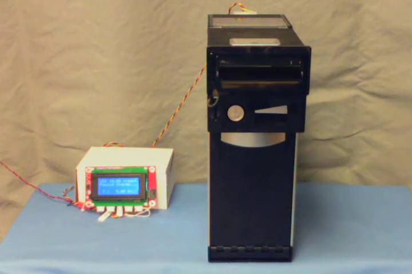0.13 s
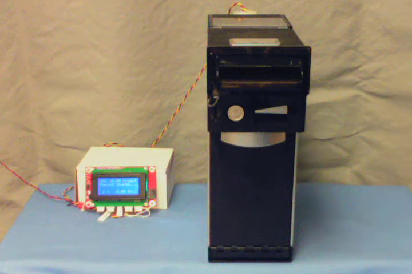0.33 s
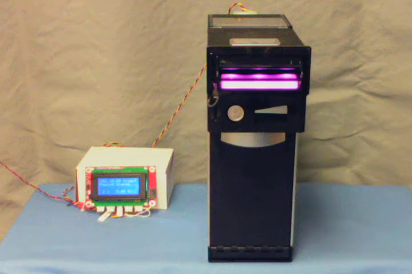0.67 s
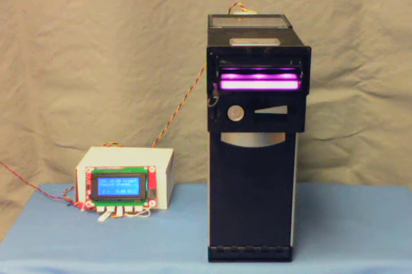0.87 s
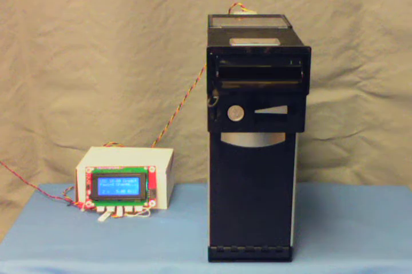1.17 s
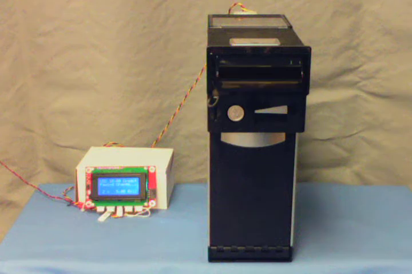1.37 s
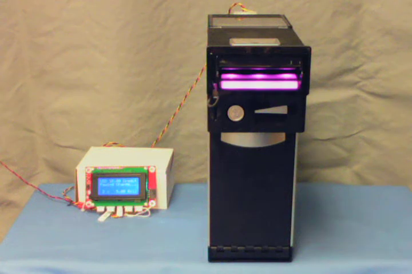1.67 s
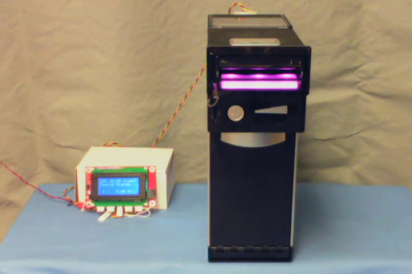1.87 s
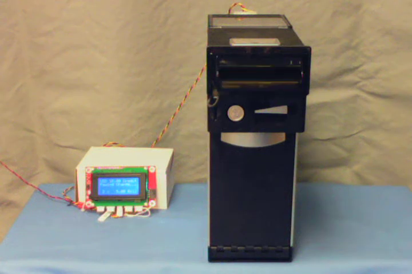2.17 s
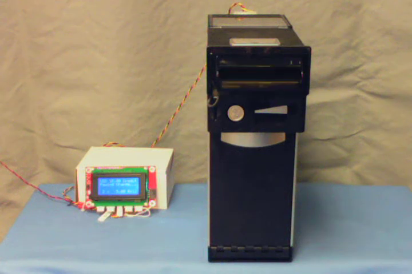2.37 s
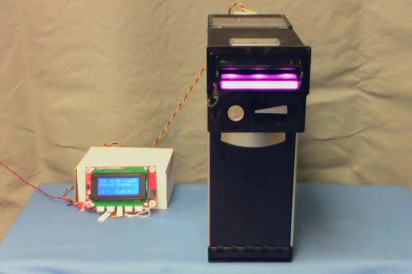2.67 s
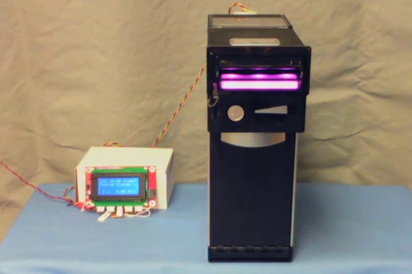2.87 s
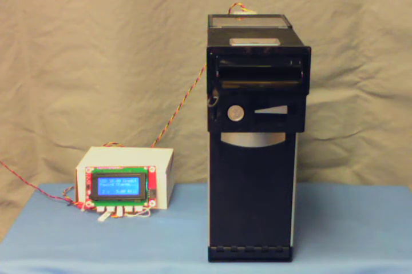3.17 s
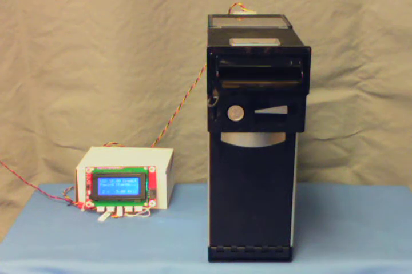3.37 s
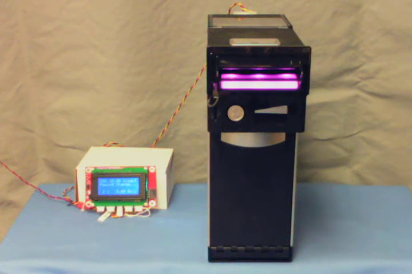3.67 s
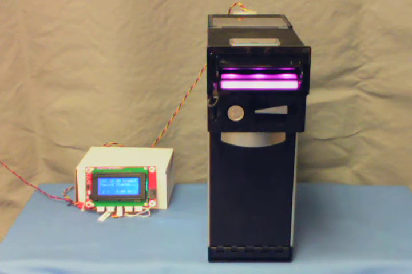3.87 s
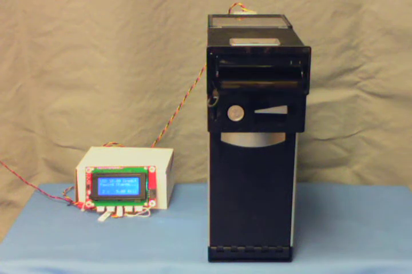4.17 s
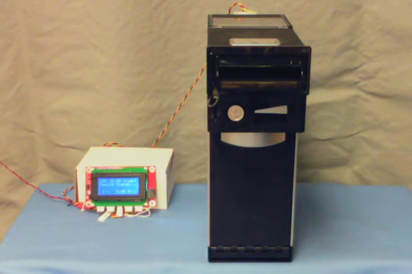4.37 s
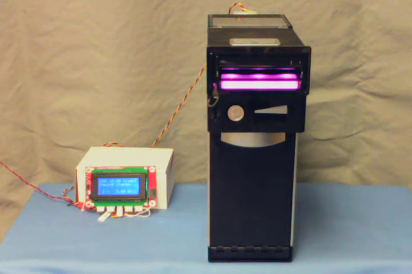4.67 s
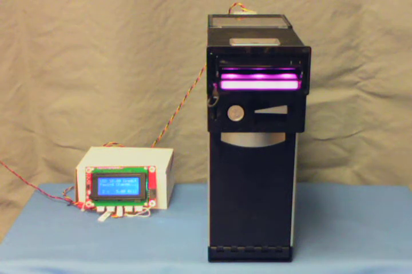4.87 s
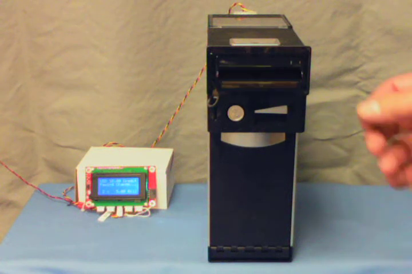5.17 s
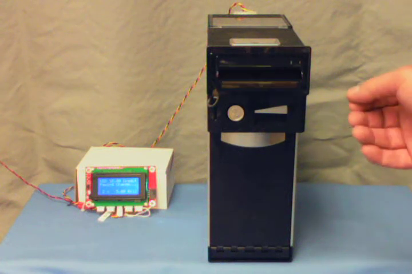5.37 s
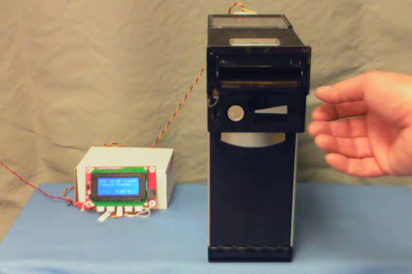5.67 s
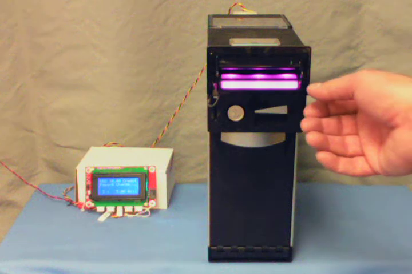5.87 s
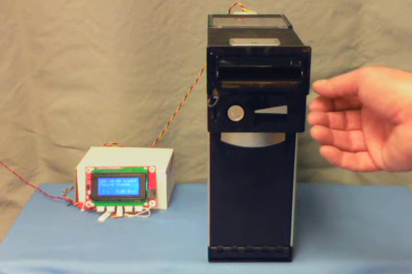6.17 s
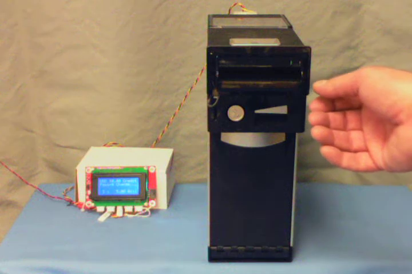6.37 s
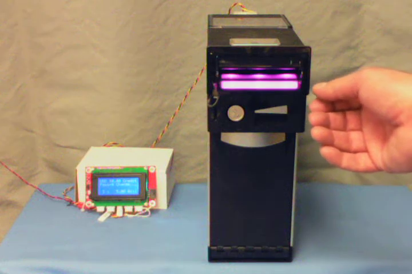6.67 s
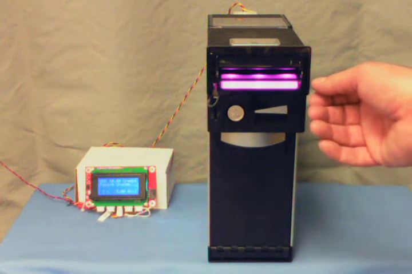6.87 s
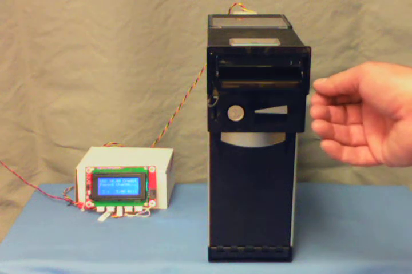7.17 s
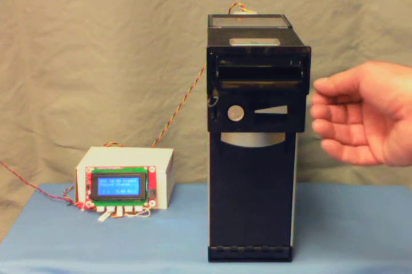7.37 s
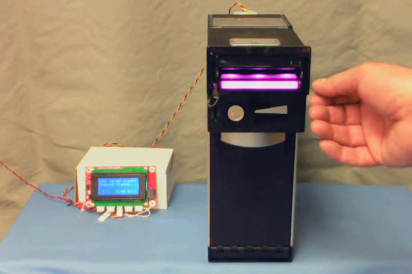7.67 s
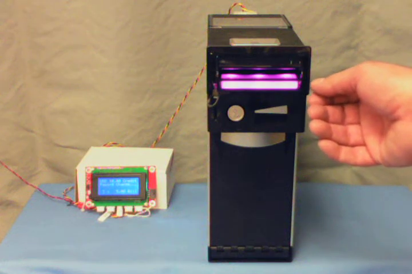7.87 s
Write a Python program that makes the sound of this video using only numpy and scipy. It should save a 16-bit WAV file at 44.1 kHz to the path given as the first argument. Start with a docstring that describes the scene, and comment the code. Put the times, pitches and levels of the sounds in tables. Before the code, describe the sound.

A banknote machine works in short bursts, heard from nearby in a quiet room. Two accelerating motor whirs come first, then a few small plastic clicks and a longer, pulsing gear grind. A brief lull holds a soft knock and another quiet, clicking slide. Finally a sharp snap sets off a motor, which grows louder as the rollers engage. A low room rumble continues throughout.

```python
"""Banknote validator self-test

On a table in a small, cloth-hung room, a belt motor speeds up twice, small guides slide against their
stops, a geared stacker grinds through one stroke, then a latch snaps and the feed rollers start.
Each drive is a source and a filter: tooth impacts excite the resonances of the housing, and the gears
whine at multiples of the shaft rate. The electronics whistle faintly over a low room rumble."""
import sys
import numpy as np
from scipy import signal
from scipy.fft import rfft, irfft
from scipy.io import wavfile
from scipy.ndimage import uniform_filter1d

SR = 44100
rng = np.random.default_rng(int(sys.argv[2]) if len(sys.argv) > 2 else 0)


def transcribe(signal):
    """Save signal, clipped to [-1, 1], as a 16-bit WAV file at the path in sys.argv[1]."""
    frames = np.atleast_2d(signal).T
    limited = np.clip(frames, -1, 1)
    pcm = np.round(limited * 32767).astype(np.int16)
    wavfile.write(sys.argv[1], SR, pcm)


N = 353241
TIME = np.arange(N) / SR

# belt runs, rumble and treble at top speed: start_s, stop_s, rumble_db, treble_db, boom_db, boom_rate_hz
BELT_MOTOR_RUNS = [(0.19, 1.289, -43, -59, -52, 290), (1.506, 2.56, -43.5, -62, -45.5, 220)]
# speed of the belt pulley: time_s, tooth_rate_hz
BELT_TOOTH_RATE = [(.2, 110), (.7, 232), (.78, 288), (.84, 305), (.95, 356), (1.01, 350), (1.18, 383),
                   (1.38, 290), (1.5, 110), (1.8, 183), (1.89, 215), (1.96, 255), (2.08, 304), (2.16, 335),
                   (2.25, 353), (2.42, 345), (2.53, 322), (2.62, 260)]
# belt gear partials, one table a run: tooth_rate_multiple, relative_db
BELT_ORDERS = [
    [(2.7, 7), (9, -9), (12, -6), (15, -6), (18, -9), (36, -8)],
    [(2.4, 9), (5.25, -7), (8, -6), (12, -11), (15, -14), (18, -12)],
]
# low and high responses of the belt drive, one table a run: frequency_hz, gain_db
BELT_RUMBLE_SPECTRA = [
    [(65, -41), (110, -12.5), (190, -1), (301, -8), (344, 3), (423, -11), (483, 2.5), (546, -14), (663, -7),
     (1050, -13.5), (1340, -29), (2000, -32), (2600, -48), (4400, -120)],
    [(65, -59), (110, -14), (165, -3), (290, -5.5), (355, 0), (455, -16), (495, -4.5), (587, -14),
     (671, -7.5), (835, -11.5), (1130, -24.5), (2000, -38), (2600, -54), (4400, -120)],
]
BELT_HISS_SPECTRA = [
    [(760, -31), (1300, -1.5), (1720, -5), (2150, 0.5), (3000, -8.5), (3740, -8), (6300, -5), (8440, -17.5),
     (11900, -7), (15800, -14)],
    [(760, -28), (1300, -8), (1850, -3), (3060, -7.5), (3470, -8), (6100, -16.5), (7520, -19.5),
     (11700, -14), (15800, -22)],
]
# tones of the belt motor's windings: pitch_hz, level_db
WINDING_TONES = [(500.6, -68.5), (2003, -78), (2503, -81), (4506, -89)]

# stacker stroke, plate judder under spring load, and guide moves: start_s, stop_s, level_db
STACKER_STROKE = (3.899, 5.733, -39)
PLATE_STRAIN = (4.62, 5.42, -45)
GUIDE_SLIDES = [(2.897, 3.2, -55.5), (6.185, 6.523, -55)]
# shaft speeds of the stacker, unloaded feed motor and rollers: time_s, rotation_hz
STACKER_SPEED = [(3.90, 30.8), (3.97, 32.47), (4.07, 33.34), (4.3, 31.49), (4.55, 31.01), (4.8, 31.36),
                 (5.3, 30.85), (5.5, 31.43), (5.75, 31.33)]
FEED_SPEED = [(7.26, 45), (7.36, 45.5), (7.45, 49.6)]
ROLLER_SPEED = [(7.62, 25), (7.67, 33), (7.72, 38.4), (7.86, 38.3), (8.01, 37.2)]
# partials locked to those shafts: shaft_multiple, relative_db
STACKER_ORDERS = [(7, -26.5), (10, -13.5), (11, -13), (12, -11), (13, -19), (15, -20.5), (16, -17.5),
                  (28, -13)]
FEED_ORDERS = [(3.6, -14), (7.2, -14), (14.2, -19), (37, -19), (40, -20), (55, -20), (76, -20), (80, -19),
               (95, -20), (97, -22), (120, -24)]
ROLLER_ORDERS = [(8.2, -17), (23, -19), (40, -22), (43, -22), (52, -24), (80, -24), (93, -22), (120, -14.5)]
# broad response of the structure to each source: frequency_hz, gain_db
STACKER_SPECTRUM = [(120, -15), (220, -13.5), (350, -0.5), (600, -9.5), (850, -1), (1170, -18),
                    (2200, -4.5), (2950, -17), (3600, -10.5), (4900, -16), (5500, -18.5), (7800, -27),
                    (12000, -31), (15800, -37)]
FEED_SPECTRUM = [(76, -34), (130, -6.5), (247, -21), (348, -2), (470, -8.5), (842, -6), (1140, -15),
                 (1770, -9), (3040, -17), (3800, -17.5), (4200, -20), (4730, -22), (15800, -32)]
ROLLER_SPECTRUM = [(76, -48), (130, -12), (273, -10.5), (315, -1.5), (434, -11.5), (530, -7), (635, -16),
                   (912, -8.5), (1160, -20), (1480, -14.5), (3230, -17), (4550, -17), (6660, -27.5),
                   (14300, -34), (15800, -34)]
GUIDE_SPECTRUM = [(76, -15), (130, -1), (490, -1), (556, -6.5), (860, -8), (1190, -19), (1280, -12.5),
                  (1510, -18.5), (2560, -14), (3180, -24), (6010, -27.5), (6830, -39), (10000, -36),
                  (13000, -68), (22000, -120)]
CLICK_SPECTRUM = [(90, -39), (160, -5), (360, 4.5), (600, -8), (850, 7.5), (1230, -16.5), (1800, -4.5),
                  (2400, 0.5), (3020, -10.5), (3600, -8.5), (5100, -16.5), (7000, -24), (15000, -25)]
CRACK_SPECTRUM = [(2500, -17), (6000, 0), (9000, -2.5), (11500, -2.5), (15800, -3.5)]
KNOCK_SPECTRUM = [(71, -9), (120, -1.5), (431, -1.5), (627, -6), (927, -8), (1460, -25.5), (2480, -27.5),
                  (3080, -37), (3720, -36), (5000, -53), (6500, -90), (11000, -120)]
# panel resonances of the housing for each drive: centre_hz, width_hz, gain_db
BELT_MODES = [(1850, 200, 7), (2800, 400, 3), (3750, 300, 7), (4350, 300, 7), (5150, 200, 4),
              (5800, 300, 6), (6500, 350, 8)]
STACKER_MODES = [(347, 60, 2), (890, 114, 4), (1064, 120, 4.5), (1275, 29, 7.5), (1313, 61, 3.5),
                 (1726, 51, 4.5), (2170, 50, 0), (2370, 68, 7), (2657, 240, 7), (3520, 270, 4),
                 (4930, 110, 9), (9300, 340, 4), (14200, 700, -2)]
FEED_MODES = [(846, 240, 4), (1900, 220, 4), (3780, 300, 10.5), (4790, 460, 13), (5930, 200, 8)]
ROLLER_MODES = [(318, 48, 5.5), (867, 140, 1), (1200, 126, -4), (1560, 180, 1.5), (3560, 180, 4.5),
                (4500, 250, 1.5), (6070, 180, 8), (14000, 1500, 7)]

# impacts of stops and latches: start_s, strength_db, brightness_db, t60_s
LATCH_CLICKS = [(2.896, -34, -21, 0.064), (2.994, -34, -33, 0.029), (3.022, -33.5, -27, 0.11),
                (3.031, -37, -26, 0.066), (3.06, -36, -25, 0.09), (3.183, -33, -20, 0.076),
                (5.398, -21, -11.5, 0.05), (6.385, -33, -16, 0.067), (6.394, -30.5, -22, 0.069),
                (6.403, -29, -28, 0.069), (6.513, -36, -9, 0.044), (7.323, -30, -22, 0.046),
                (7.335, -16, -8.5, 0.08), (7.34, -22.5, -11, 0.036), (7.638, -20, -22, 0.08)]
# impacts of slack in the drive: start_s, peak_db, t60_s, ring_hz
SLACK_KNOCKS = [(0.423, -47, 0.07, 345), (0.955, -30, 0.18, 462), (1.637, -37.5, 0.069, 900),
                (2.374, -42, 0.082, 334), (3.784, -40.5, 0.1, 250), (3.841, -33.5, 0.042, 253),
                (6.053, -32.5, 0.18, 357), (6.075, -31, 0.11, 353), (7.2, -43.5, 0.09, 363)]
# ping of a small spring: start_s, peak_db, pitch_hz, half_width_hz
SPRING_PING = (3.022, -41, 11400, 1100)

# hum, constant and with the stacker parked after its stroke: pitch_hz, level_db
STEADY_HUM = [(667, -75), (10002, -87)]
PARKED_HUM = [(129, -61.5)]
# spectrum of the room rumble: frequency_hz, gain_db
RUMBLE_SPECTRUM = [(8.8, -56), (15, -9.5), (49, -1), (95, -21), (128, -20), (186, -31.5), (224, -25.5),
                   (243, -30.5), (513, -36), (671, -34), (767, -36.5), (976, -40), (2120, -47), (3090, -47),
                   (9000, -54.5), (11700, -88), (19800, -120)]
# peaks and a dip from the room's standing waves: centre_hz, width_hz, gain_db
RUMBLE_MODES = [(46.4, 7, 4.5), (73.2, 6.5, 8.5), (98, 18.5, -9), (174, 22, 3.5)]
# reverberation time of the room: frequency_hz, t60_s
ROOM_DECAY = [(150, 0.5), (1000, 0.29), (4000, 0.19), (15000, 0.094)]

BELT_RISE_S, BELT_COAST_S, TREBLE_COAST_S = 0.017, 0.036, 0.018
RUMBLE_DB_PER_OCTAVE, TREBLE_DB_PER_OCTAVE = 12, 15  # the belt gets louder with speed
LUMP_DB, LUMP_RATE_HZ = 1.1, 45  # the belt runs unevenly
FEED_ON_S, ENGAGE_S, FEED_OFF_S, FEED_COAST_S = 7.269, 7.634, 8.1, 0.0062


def belt(tooth_count=12, dull_hz=500, boom_width_hz=39):
    """Meshing excitation: a belt on a toothed pulley grows louder and brighter as the tooth rate rises."""
    mesh = shaft(BELT_TOOTH_RATE, flutter=.008)
    turns = mesh / tooth_count
    speed_octaves = octaves(BELT_TOOTH_RATE)
    speed_ratio = 2 ** speed_octaves
    lowpass = signal.butter(2, dull_hz, fs=SR, output="sos")
    out = np.zeros(N)
    runs = zip(BELT_MOTOR_RUNS, BELT_RUMBLE_SPECTRA, BELT_HISS_SPECTRA, BELT_ORDERS)
    for (start, stop, rumble_db, treble_db, boom_db, boom_rate_hz), body, treble, orders in runs:
        chatter = teeth(turns, repeat=.7, grit_db=2) * gain_of(LUMP_DB * drift(LUMP_RATE_HZ))
        rumble = unit_rms(colour(chatter, body))
        dull = signal.sosfiltfilt(lowpass, rumble)
        rumble = dull + speed_ratio * (rumble - dull)  # slow teeth land softly
        rumble *= gain_of(rumble_db + RUMBLE_DB_PER_OCTAVE * speed_octaves)
        resonance = np.exp(-((curve(BELT_TOOTH_RATE) - boom_rate_hz) / boom_width_hz) ** 2)
        boom = resonance * whine(mesh, [(0.95, boom_db)], waver=0.24)
        # the partials flare as they sweep through the panel resonances
        gear_whine = colour(whine(mesh, orders, waver=.9), [(2500, -10), (7000, -10)], BELT_MODES)
        hiss = unit_rms(colour(teeth(turns, repeat=0.43, grit_db=3), treble))
        highs = hiss + speed_ratio * gear_whine
        highs *= gain_of(treble_db + TREBLE_DB_PER_OCTAVE * speed_octaves)
        out += running(start, stop, BELT_RISE_S, BELT_COAST_S) * (rumble + boom)
        out += running(start, stop, BELT_RISE_S, TREBLE_COAST_S) * highs
    return out


def stacker(wheel_hz=14.6, bind_s=4.543, db_per_octave=9):
    """Amplitude modulation: gears grind under a cyclic load, a wheel scrapes, a strained plate judders."""
    turns = shaft(STACKER_SPEED, flutter=0.0056)
    turns -= np.interp(bind_s, TIME, turns)  # shaft and slower wheel bind together at bind_s
    wheel = wheel_hz * (TIME - bind_s)
    load = throb(turns, depth_db=1.6) * throb(wheel, depth_db=1.5) * throb(4 * turns, depth_db=.6)
    impacts = load * teeth(turns, repeat=0.21, grit_db=1.5)
    chatter = unit_rms(colour(impacts, STACKER_SPECTRUM, STACKER_MODES))
    pressure = throb(wheel, depth_db=5) * throb(turns, depth_db=2) * gain_of(1.8 * drift(30))
    friction = pressure * teeth(turns, repeat=0.077, grit_db=4.5)
    scrape = unit_rms(colour(friction, [(2000, -20), (4500, 5), (6500, -3), (8000, -6), (15800, -8)]))
    gears = chatter + gain_of(-12.5) * scrape + load * whine(turns, STACKER_ORDERS, waver=0.29)
    start, stop, level_db = STACKER_STROKE
    gears *= gain_of(level_db + db_per_octave * octaves(STACKER_SPEED))
    return running(start, stop, rise_s=0.023, coast_s=0.011) * gears + plate_judder(turns)


def plate_judder(turns):
    """Forced vibration: the gears shake the stacker plate while it presses on its spring."""
    start, stop, level_db = PLATE_STRAIN
    force = teeth(turns, repeat=.2, grit_db=3)
    plate = colour(force, [(90, -22), (150, -2.5), (220, 0.5), (500, -6.5), (800, -13), (1500, -43)])
    return gain_of(level_db) * running(start, stop, rise_s=0.18, coast_s=0.056) * unit_rms(plate)


def feed(free_db=-44.5, roller_db=-37, db_per_octave=12):
    """Gear noise follows shaft speed: the feed motor spins free, then drags the rollers up to speed."""
    free_turns = shaft(FEED_SPEED, flutter=.005)
    roller_turns = shaft(ROLLER_SPEED, flutter=.003)
    free_whine = whine(free_turns, FEED_ORDERS, waver=.45)
    roller_whine = whine(roller_turns, ROLLER_ORDERS, waver=.3)
    free_chatter = colour(teeth(free_turns, repeat=0.29, grit_db=3), FEED_SPECTRUM, FEED_MODES)
    roller_chatter = colour(teeth(roller_turns, repeat=0.35, grit_db=2.4), ROLLER_SPECTRUM, ROLLER_MODES)
    motor = gain_of(free_db) * (unit_rms(free_chatter) + free_whine)
    rollers = unit_rms(roller_chatter) + roller_whine
    rollers *= gain_of(roller_db + db_per_octave * octaves(ROLLER_SPEED))
    return (motor * running(FEED_ON_S, ENGAGE_S, rise_s=0.011, coast_s=FEED_COAST_S)
            + rollers * running(ENGAGE_S, FEED_OFF_S, rise_s=0.004, coast_s=FEED_COAST_S))


def latches():
    """Impact excitation: stops and latches strike, each with a click and a brief bright crack."""
    out = np.zeros(N)
    for start, strength_db, brightness_db, t60_s in LATCH_CLICKS:
        click = impact(CLICK_SPECTRUM, t60_s, rise_s=0.00068)
        crack = impact(CRACK_SPECTRUM, t60_s=0.034, rise_s=.0008)
        add(out, start, gain_of(strength_db - 7.5) * click)
        add(out, start, gain_of(strength_db + brightness_db + 4) * crack)
    return out


def knocks(width_hz=60, ring_db=9):
    """Backlash: slack in the drive closes with a dull knock that rings one resonance."""
    out = np.zeros(N)
    for start, peak_db, t60_s, ring_hz in SLACK_KNOCKS:
        knock = impact(KNOCK_SPECTRUM, t60_s, rise_s=0.0017, modes=[(ring_hz, width_hz, ring_db)])
        add(out, start, gain_of(peak_db) * knock)
    return out


def spring():
    """Damped resonance: a small spring pings once in a high band."""
    start, peak_db, pitch_hz, half_width_hz = SPRING_PING
    mode = (pitch_hz, 2 * half_width_hz, 20)
    ping = impact([(3000, -33), (9000, -18)], t60_s=0.025, rise_s=.0004, modes=[mode])
    out = np.zeros(N)
    add(out, start, gain_of(peak_db) * ping)
    return out


def guides(rotation_hz=62):
    """Mostly aperiodic tooth contact: a small motor slides the note guides in and out."""
    chatter = unit_rms(colour(teeth(rotation_hz * TIME, repeat=0.091, grit_db=1.5), GUIDE_SPECTRUM))
    return chatter * sum(gain_of(level_db) * running(start, stop, rise_s=0.0026, coast_s=0.013)
                         for start, stop, level_db in GUIDE_SLIDES)


def windings():
    """Magnetic force: chopped current makes the belt motor's windings sing while it is on."""
    powered = sum(running(start, stop, BELT_RISE_S) for start, stop, *_ in BELT_MOTOR_RUNS)
    return powered * tones(WINDING_TONES)


def reverberation(x, gap_s=.006):
    """Absorption: the cloth-hung room leaves a short diffuse tail whose treble dies first."""
    reflections = rng.standard_normal(SR // 2) * (TIME[:SR // 2] > gap_s)
    hz, t, bands = signal.stft(reflections, SR, nperseg=256)
    decay = gain_of(-60 * t / value_at(ROOM_DECAY, hz)[:, None])
    tail = signal.istft(bands * decay, SR, nperseg=256)[1]
    return signal.fftconvolve(x, tail / np.linalg.norm(tail))[:N]


def background(rumble_db=-48, hiss_db=-75):
    """Noise floor: a low rumble shaped by the room's modes, with thin hiss and hum."""
    hz = np.fft.rfftfreq(N, 1 / SR)
    response = gain_of(value_at(RUMBLE_SPECTRUM, hz) + resonance_db(RUMBLE_MODES, hz))
    rumble = unit_rms(irfft(rfft(rng.standard_normal(N)) * response, N))
    hiss = unit_rms(colour(rng.standard_normal(N), [(5000, -30.5), (9500, -5), (15800, -4)]))
    hum = tones(STEADY_HUM) + running(start_s=5.78, stop_s=7.27) * tones(PARKED_HUM)
    return gain_of(rumble_db) * rumble + gain_of(hiss_db) * hiss + hum


def whistle(pitch_hz=11733, switch_hz=68.2, level_db=-70):
    """Sidebands: periodic flips of sign spread a tone in the electronics into a comb."""
    polarity = np.tanh(12 * np.sin(2 * np.pi * switch_hz * TIME))
    return polarity * tones([(pitch_hz, level_db)])


def shaft(speed, flutter):
    """Phase is the integral of rate: cycles completed at a slightly fluttering speed."""
    return np.cumsum(curve(speed) * (1 + flutter * drift(40))) / SR


def teeth(turns, repeat, grit_db, flaw_count=1024):
    """Gear chatter: flaws recurring each turn carry the power share `repeat`, loose impacts the rest."""
    flaws = signal.resample(rng.standard_normal(flaw_count), 8 * flaw_count)
    worn = np.interp(turns % 1, np.linspace(0, 1, len(flaws)), flaws)
    loose = rng.standard_normal(N) * gain_of(grit_db * drift(400))
    return np.sqrt(repeat) * unit_rms(worn) + np.sqrt(1 - repeat) * unit_rms(loose)


def whine(turns, orders, waver):
    """Rotational orders: partials locked to a shaft, each wavering in strength."""
    return sum(sine(order * turns, db) * unit_rms(1 + waver * drift(25)) for order, db in orders)


def throb(turns, depth_db):
    """Eccentricity: an off-centre wheel presses harder once a turn."""
    return gain_of(depth_db * np.cos(2 * np.pi * turns))


def running(start_s, stop_s, rise_s=.004, coast_s=.004):
    """First-order response: an envelope rises at switch-on, holds, and decays after switch-off."""
    return (1 - np.exp(-np.maximum(TIME - start_s, 0) / rise_s)) * np.exp(
        -np.clip((TIME - stop_s) / coast_s, 0, 20))


def impact(spectrum, t60_s, rise_s, modes=()):
    """Damping: a burst of tiny contacts dies away in the plastic case; the peak is about 1."""
    t = TIME[:SR // 4]
    burst = rng.standard_normal(len(t)) * gain_of(-60 * t / t60_s) * (1 - np.exp(-t / rise_s))
    sound = colour(burst, spectrum, modes)
    loudest_rms = np.sqrt(uniform_filter1d(sound ** 2, 256).max())
    return sound / (3 * loudest_rms)


def colour(x, spectrum, modes=()):
    """Minimum-phase filtering: a broad spectrum with panel resonances on top."""
    hz = abs(np.fft.fftfreq(4096, 1 / SR))
    log_gain = np.maximum(value_at(spectrum, hz) + resonance_db(modes, hz), -100) * np.log(10) / 20
    ring = np.fft.ifft(np.exp(np.conj(signal.hilbert(log_gain)))).real
    return signal.oaconvolve(x, ring[:len(ring) // 2])[:len(x)]


def resonance_db(modes, hz):
    """Lorentzian peaks and dips, summed in decibels."""
    return sum(db / (1 + (2 * (hz - centre) / width) ** 2) for centre, width, db in modes)


def tones(rows):
    """Superposition of steady sines."""
    return sum(sine(pitch_hz * TIME, level_db) for pitch_hz, level_db in rows)


def sine(cycles, rms_db):
    """A sinusoid of random starting phase."""
    return gain_of(rms_db) * np.sqrt(2) * np.sin(2 * np.pi * (cycles + rng.random()))


def drift(rate_hz):
    """Random fluctuation of rms 1."""
    knots = rng.standard_normal(N // 100)
    return unit_rms(np.interp(TIME * rate_hz, np.arange(len(knots)), knots))


def octaves(speed):
    """Speed relative to its maximum, in octaves."""
    return np.log2(curve(speed) / curve(speed).max())


def curve(rows):
    """Linear interpolation of a time table at every sample."""
    return np.interp(TIME, *np.transpose(rows))


def value_at(rows, hz):
    """Interpolation on a log-frequency axis."""
    frequency_hz, value = np.transpose(rows)
    return np.interp(np.log(hz + 1), np.log(frequency_hz + 1), value)


def gain_of(db):
    """Decibels to amplitude."""
    return 10 ** (np.asarray(db) / 20)


def unit_rms(x):
    """Normalisation to rms 1."""
    return x / np.sqrt(np.mean(x ** 2) + 1e-20)


def add(mix, start_s, sound):
    """Superposition of a delayed sound on the mix."""
    part = mix[round(start_s * SR):][:len(sound)]
    part += sound[:len(part)]


def scene():
    """Superposition of the direct sound, its reverberation and the background, in one channel."""
    motors = belt() + guides() + stacker() + feed()
    impacts = latches() + knocks() + spring()
    tail = reverberation(gain_of(-12.5) * motors + gain_of(-11) * impacts)
    return (motors + impacts + tail + windings() + background() + whistle())[None]


def record(dry):
    """Band limiting: a steep low-pass removes the highest treble."""
    cutoff_hz = 15900
    lowpass = signal.firwin(511, cutoff_hz, window=("kaiser", 9), fs=SR)
    return signal.oaconvolve(dry, lowpass[None], "same")


dry = scene()
out = record(dry)
transcribe(out)
```